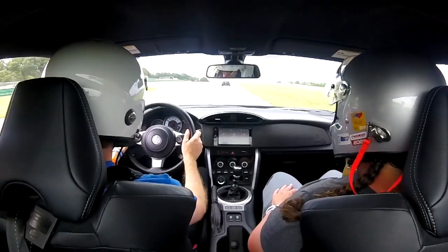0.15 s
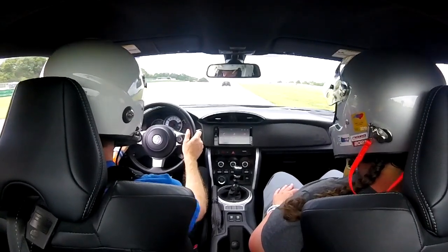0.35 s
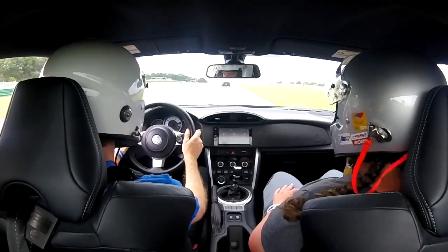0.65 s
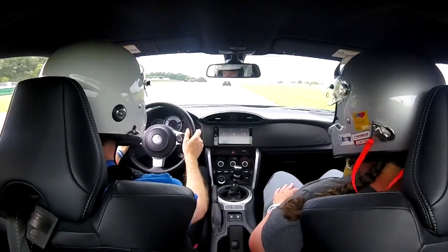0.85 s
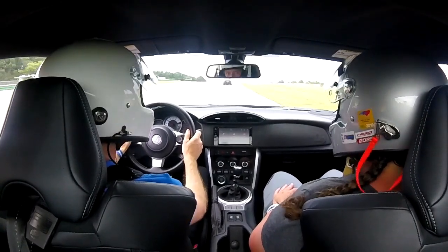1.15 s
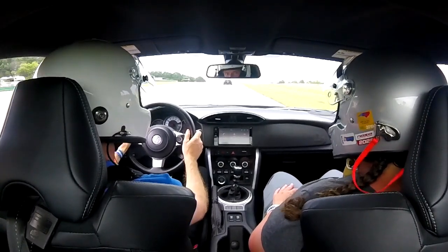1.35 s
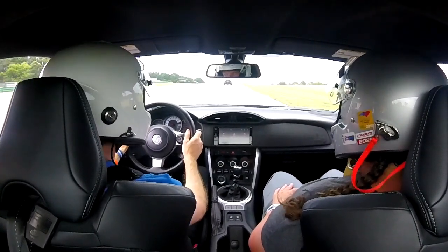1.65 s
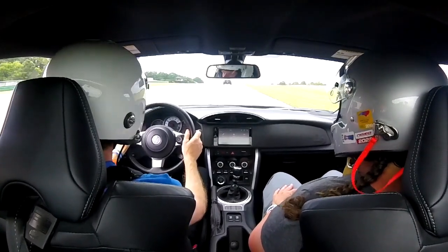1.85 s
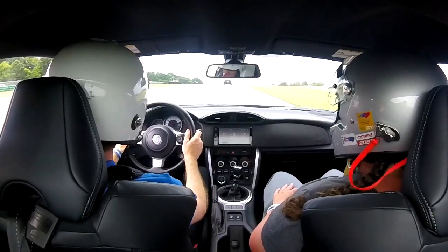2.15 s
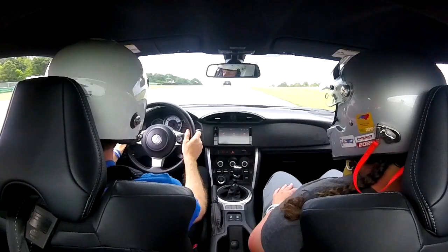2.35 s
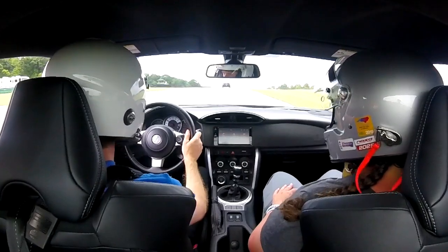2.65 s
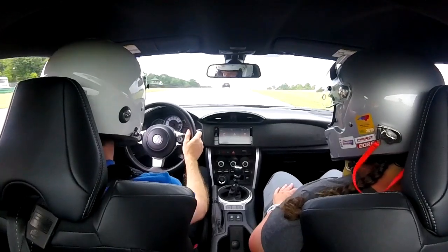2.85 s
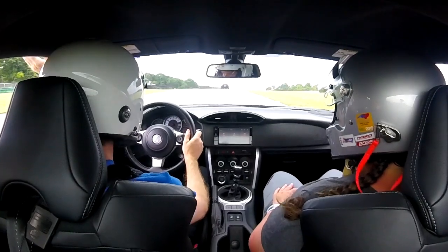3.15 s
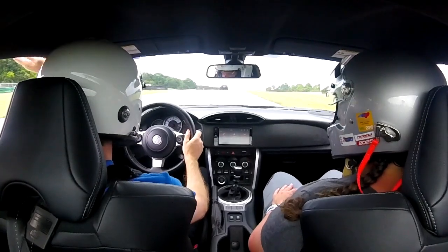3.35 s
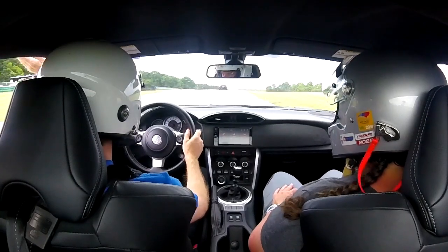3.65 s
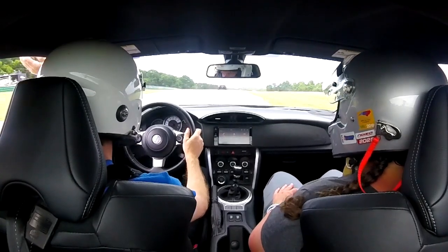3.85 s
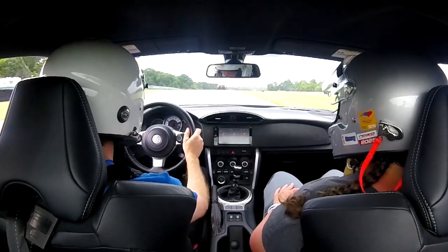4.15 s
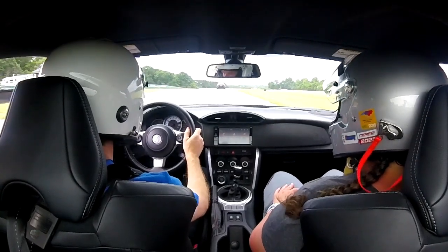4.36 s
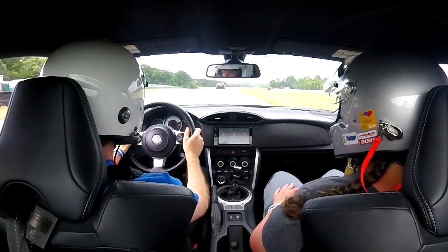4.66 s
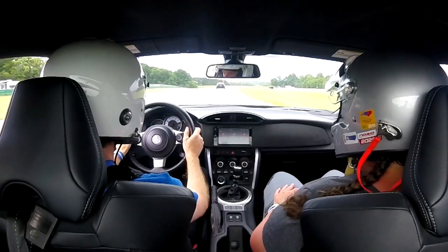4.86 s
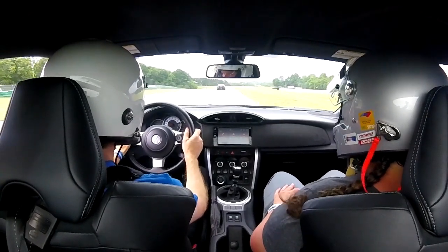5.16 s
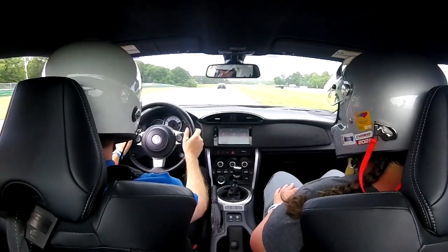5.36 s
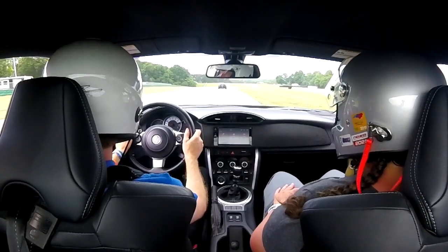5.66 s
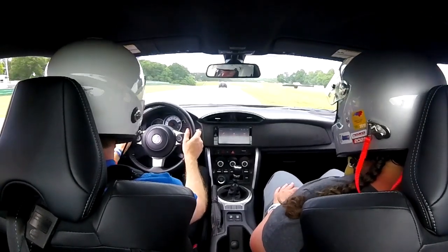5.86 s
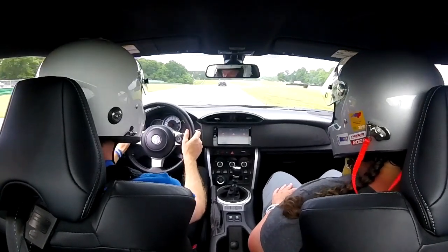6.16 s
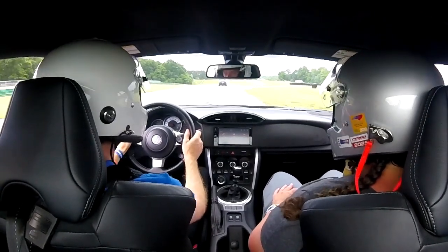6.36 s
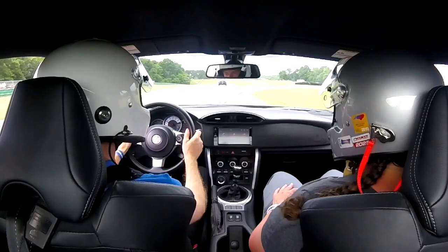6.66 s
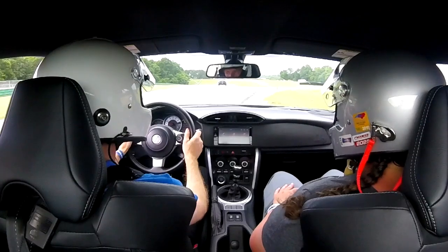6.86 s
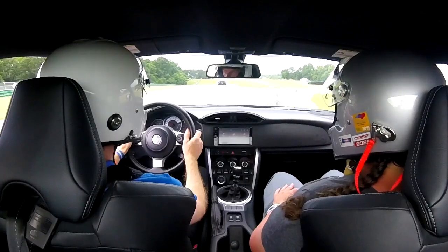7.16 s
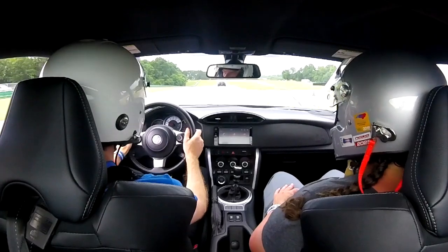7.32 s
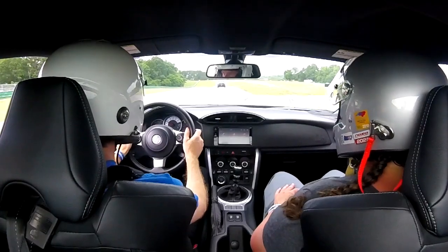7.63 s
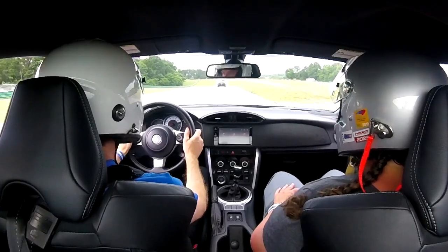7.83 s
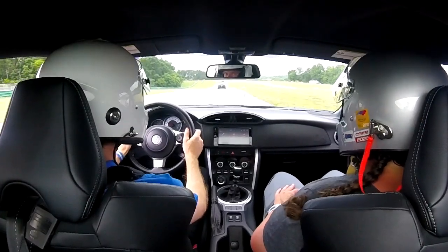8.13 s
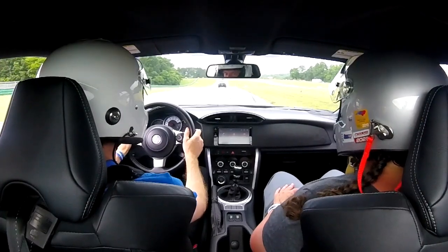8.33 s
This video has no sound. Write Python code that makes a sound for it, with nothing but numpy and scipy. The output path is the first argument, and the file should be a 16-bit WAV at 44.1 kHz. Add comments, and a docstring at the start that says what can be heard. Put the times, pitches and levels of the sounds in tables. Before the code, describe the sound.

Heard from the rear of a sports car cabin with windows down, a four-cylinder engine hums around 170 hertz on light throttle, sinking gradually to about 151 by 6.7 seconds. Underneath, cabin air throbs deeply near 28 hertz in uneven swells, strongest early, with tyre and wind roar and a fluttering, slightly whistling window hiss. Scattered soft gusts bump the microphone in the first three seconds; a faint, high brake squeal wavers at 1.6, with a weaker one at 1.8. From 3.4 to 6.8 wind slaps crowd together, thudding and crackling, hardest around 4.5, 5.2, 5.6 and 6.2, while the high hiss fades, almost vanishing by 6.9. Gusts then thin out. From 7.1 to 7.4 the throttle opens: the engine swells, gaining a rougher, fuller upper tone and creeping up slightly. Hiss partly returns; hard gusts strike around 8.25 before the end at 8.5.

```python
"""The engine of a four-cylinder sports car, heard from behind the seats with the windows down.
Its stacked tones sink slowly through a bend, then grow louder as the throttle opens and the pitch creeps up.
Shaped noise makes the throb of the cabin air, the roar of tyres and wind, and the hiss at the window frames.
Gusts slap the microphone with short pulses and bursts of noise, crowding together in the bend.
Two faint brake squeals are wavering tones."""
import sys
import numpy as np
from scipy import signal
from scipy.fft import rfft, irfft
from scipy.io import wavfile
from scipy.ndimage import uniform_filter1d

SR = 44100
rng = np.random.default_rng(int(sys.argv[2]) if len(sys.argv) > 2 else 0)


def master(y):
    """Save y as 16-bit WAV."""
    cut = np.clip(np.atleast_2d(y).T, -1, 1)
    pcm = np.round(cut * 32767)  # scale
    wavfile.write(sys.argv[1], SR, pcm.astype(np.int16))


N = 374409
T = np.arange(N) / SR  # time of each sample [s]
HZ = np.fft.rfftfreq(N, 1 / SR)  # frequency of each spectrum bin [Hz]


def gain_of(db):
    """Turns decibels into an amplitude factor."""
    return 10 ** (np.asarray(db) / 20)


def evened(x):
    """Scales a signal to rms 1."""
    return x / np.sqrt(np.mean(x ** 2) + 1e-20)


def level_curve(rows):
    """Joins the (time, level) rows of a table by straight lines."""
    seconds, level_db = np.transpose(rows)
    return np.interp(T, seconds, level_db)


def noise(colour, band, modes=()):
    """Noise with the given spectrum and resonances, scaled to rms 1 inside the band (low Hz, high Hz)."""
    colour_hz, colour_db = np.transpose(colour)
    shape_db = np.interp(np.log(HZ + 1), np.log(colour_hz), colour_db)
    for hz, width_hz, lift_db in modes:
        shape_db = shape_db + lift_db / (1 + (2 * (HZ - hz) / width_hz) ** 2)
    spectrum = rfft(rng.standard_normal(N)) * gain_of(shape_db)
    in_band = (HZ > band[0]) * (HZ < band[1])
    return irfft(spectrum, N) / np.std(irfft(spectrum * in_band, N))


def wander(hz):
    """Smooth random movement of rms 1, with little left above the given rate."""
    spectrum = rfft(rng.standard_normal(N))
    return evened(irfft(spectrum * np.exp(-(HZ / hz) ** 2), N))


def steadied(x, seconds):
    """Divides a noise by its local rms: slow swells go, the fast grain stays."""
    size = max(int(seconds * SR), 2)
    power = uniform_filter1d(uniform_filter1d(x ** 2, size), size)
    return x / np.sqrt(abs(power) + 1e-12)


def firing_rate():
    """Firings per second: a steady sag through the bend, then a slow climb."""
    start_hz, sag_hz_per_s, slowest_s, climb_hz_per_s = 169.7, 2.8, 6.7, .4
    sag = sag_hz_per_s * np.minimum(T, slowest_s)
    climb = climb_hz_per_s * np.maximum(T - slowest_s, 0)
    return start_hz - sag + climb


def pedal():
    """Throttle from 0 to 1: light through the bend, then pressed to the floor at its exit."""
    light_throttle, open_at_s = .12, 7.1
    full_travel_s = 0.28  # time for a whole 0-1 movement
    return np.clip(light_throttle + np.maximum(T - open_at_s, 0) / full_travel_s, 0, 1)


def engine():
    """Each firing repeats four times per engine cycle; tones at multiples of that cycle make the note."""
    # Strength of each tone at the two ends of the pedal; full throttle lifts orders 8 and 16 most, then 5 and 3:
    # (multiple of the four-stroke cycle, level on light throttle [dB], level on full throttle [dB])
    engine_orders = [(2, -8, -11), (3, -14, -9), (4, 0, 0), (5, -18, -12), (6, -16, -15), (7, -24, -26),
                     (8, -22, -6), (10, -21, -28), (12, -25, -22), (15, -27, -28), (16, -32, -22),
                     (20, -33, -30), (28, -38, -34)]
    base_db, full_throttle_db = -35, 7.5
    boom_hz, boom_width_hz, boom_db = 165.4, 5.3, 6
    firing, throttle = firing_rate(), pedal()
    # the cabin booms as the firing rate passes its resonance
    boom = 1 / (1 + (2 * (firing - boom_hz) / boom_width_hz) ** 4)
    engine_db = base_db + boom_db * boom + full_throttle_db * throttle
    # four firings make one cycle; its speed is slightly unsteady
    cycles = np.cumsum(firing / 4 * (1 + .0015 * wander(10))) / SR
    tones = np.zeros(N)
    for order, light_db, full_db in engine_orders:
        flutter_db = (1.2 + throttle) * wander(10)
        order_db = light_db + throttle * (full_db - light_db) + flutter_db
        tones += gain_of(order_db) * np.sin(2 * np.pi * (round(order) * cycles + rng.random()))
    return np.sqrt(2) * gain_of(engine_db) * tones


def gust_force(gust_db=0, draught_db=-1, lumpy_db=4.5, knee_db=-24, rise=1.57, fall=0.76):
    """Wind strength on the microphone, 1 at the knee level; gusts rise faster than they fall."""
    # Eddies between gusts, before the draught_db trim: (time [s], level [dB])
    draught_points = [(0, -40), (.7, -51.5), (3.0, -48.5), (3.95, -34.5), (4.35, -45), (4.9, -41.5),
                      (5.6, -31), (5.9, -36), (6.35, -32), (6.75, -39.5), (7.05, -44.5), (7.5, -50),
                      (7.75, -35.5), (8.3, -38), (8.49, -41)]
    # Stronger gusts; rise and fall reshape the length: (peak time [s], peak level [dB], nominal length [s])
    gust_peaks = [(0.094, -27, 0.037), (0.173, -27, 0.011), (0.403, -29.5, .006), (0.445, -25, .018),
                  (.817, -32.5, 0.026), (1.004, -27.5, 0.018), (1.063, -27.5, 0.011), (1.283, -33, 0.0091),
                  (1.426, -26.5, .016), (1.564, -29.5, 0.015), (2.065, -28.5, 0.017), (2.567, -30, 0.026),
                  (2.795, -33.5, 0.03), (3.407, -22.5, 0.018), (3.566, -28, 0.013), (3.603, -26.5, 0.0047),
                  (3.705, -24, 0.016), (3.762, -26, 0.023), (3.86, -25.5, .024), (3.888, -17.5, 0.013),
                  (3.923, -24, 0.025), (3.948, -21, 0.011), (4.014, -27, .031), (4.08, -25, .017),
                  (4.155, -22, 0.025), (4.215, -25, 0.019), (4.234, -21.5, .006), (4.474, -15.5, 0.0074),
                  (4.492, -15.5, 0.026), (4.636, -28.5, 0.016), (4.691, -29.5, 0.076), (4.914, -22, 0.027),
                  (5.102, -24, 0.025), (5.192, -22, 0.0026), (5.23, -16.5, .013), (5.258, -20.5, 0.02),
                  (5.382, -35, 0.021), (5.469, -22, 0.0092), (5.497, -22, 0.032), (5.604, -15.5, 0.0078),
                  (5.624, -22, 0.032), (5.661, -20.5, 0.013), (5.806, -20, 0.015), (5.836, -22.5, 0.021),
                  (5.99, -26.5, 0.054), (6.093, -19, 0.013), (6.114, -24, 0.029), (6.209, -14, 0.011),
                  (6.231, -20.5, 0.0087), (6.298, -22, 0.0093), (6.326, -24, 0.0048), (6.352, -21.5, .008),
                  (6.36, -27.5, .014), (6.426, -25, 0.015), (6.487, -23, 0.039), (6.529, -28, .023),
                  (6.644, -25, 0.016), (6.699, -22.5, 0.0065), (6.768, -21, 0.0097), (6.815, -34.5, .008),
                  (6.862, -37, 0.029), (6.941, -36.5, 0.011), (6.981, -28, 0.0087), (7.292, -29, 0.026),
                  (7.682, -22.5, 0.012), (8.035, -32, 0.011), (8.054, -27, 0.012), (8.069, -21.5, 0.01),
                  (8.242, -17, 0.013), (8.269, -13.5, 0.0071), (8.287, -20.5, 0.022), (8.354, -18.5, 0.021),
                  (8.391, -26.5, 0.02)]
    power = gain_of(level_curve(draught_points) + draught_db + lumpy_db * wander(53)) ** 2
    for s, db, length in gust_peaks:
        near = slice(max(int((s - 2 * length) * SR), 0), int((s + 2 * length) * SR))
        offset = 2 * (T[near] - s) / length
        steepness = np.where(offset < 0, rise, fall)
        power[near] += gain_of(db + gust_db) ** 2 * np.exp(-(offset * steepness) ** 2)
    return np.sqrt(power) / gain_of(knee_db)


def cabin(force, swell_db=3.5, follow=0.87):
    """Cabin air throbs like a blown bottle; broader low buffeting swells with the gusts."""
    # Throb of the cabin air, before its random swells: (time [s], level [dB])
    throb_points = [(0, -10.5), (.7, -20), (1.03, -10), (1.7, -17.5), (2.65, -12.5), (3.3, -18),
                    (4.15, -17), (5.1, -14.5), (5.45, -19.5), (7.4, -22), (7.85, -17), (8.49, -24)]
    # Low buffeting between gusts: (time [s], level [dB])
    buffet_points = [(0, -22), (1.2, -26.5), (3.1, -24), (3.5, -16.5), (4.0, -20), (4.35, -25), (5.6, -20),
                     (6.2, -28), (7.15, -29.5), (8.3, -19)]
    # Spectra of throb and buffeting: (frequency [Hz], relative level per Hz [dB])
    throb_colour = [(10, -3.5), (20, 9), (28, 13.5), (34, 7.5), (45, 1), (70, -9.5), (140, -73.5)]
    buffet_colour = [(25, -28), (50, 3), (82, 4.5), (115, -1.5), (200, -8), (300, -19.5), (450, -54),
                     (1000, -65.5)]
    # what a gust of force 1 adds, and the time over which the force is averaged
    buffet_gust_db, smoothing_s = -21, 0.033
    throb = steadied(noise(throb_colour, (18, 48)), .12)
    buffet = steadied(noise(buffet_colour, (50, 135)), .1)
    push = abs(uniform_filter1d(force, int(smoothing_s * SR))) ** follow
    buffet_gain = np.hypot(gain_of(level_curve(buffet_points)), gain_of(buffet_gust_db) * push)
    throb_gain = gain_of(level_curve(throb_points) + swell_db * wander(5.7))
    return throb * throb_gain + buffet * buffet_gain


def airflow(hiss_db=-4.0, flutter_db=1.76):
    """Tyres and passing air roar; the window frames add a fluttering hiss and a thin jet through a gap."""
    # Hiss at the window frames, before the hiss_db trim: (time [s], level [dB])
    hiss_points = [(0, -53.5), (1.7, -57), (2.05, -53.5), (2.45, -55), (4.3, -57.5), (6.4, -62.5),
                   (6.9, -73), (7.3, -62.5), (8.49, -59)]
    # Resonances of the window gaps: (frequency [Hz], width [Hz], lift [dB])
    gap_modes = [(2420, 88, 5.5), (2650, 130, 12.5), (2893, 82, 7.5), (2970, 40, 3.5), (3190, 110, 3.5),
                 (3680, 61, 3), (4640, 120, 1.5)]
    # Spectra of roar, hiss and jet: (frequency [Hz], relative level per Hz [dB])
    roar_colour = [(100, -20), (250, 6.5), (450, 3.5), (700, -2.5), (1000, -6.5), (1500, -11), (2000, -14),
                   (2700, -25.5), (3600, -25), (5000, -45.5), (6500, -52), (7800, -32), (9500, -73),
                   (15000, -42)]
    hiss_colour = [(800, -3), (2200, 9.5), (2700, 2.5), (3200, 6), (3600, 2.5), (5200, 2.5), (6000, -3.5),
                   (7000, -9.5), (15000, -21)]
    jet_colour = [(3000, -26), (5000, -15), (6100, 5.5), (6420, 10.5), (6650, 4.5), (6950, -12),
                  (9500, -18), (15000, -8)]
    # roar_db holds where the hiss curve is at cruise_hiss_db; roar_follow is dB of roar per dB of hiss
    roar_db, cruise_hiss_db, roar_follow, roar_throttle_db = -44.5, -56.5, 0.54, -1.5
    # the jet's level against the hiss, and its dying away in the bend
    jet_db, jet_fades_s, jet_fade_db_per_s = -4.3, 4.2, 8
    hiss_level = level_curve(hiss_points)
    roar_level = roar_db + roar_follow * (hiss_level - cruise_hiss_db) + roar_throttle_db * pedal()
    jet_level = hiss_level + jet_db - jet_fade_db_per_s * np.maximum(T - jet_fades_s, 0)
    roar = noise(roar_colour, (500, 2000))
    hiss = noise(hiss_colour, (3500, 5500), gap_modes)
    jet = noise(jet_colour, (5500, 7000))
    window = hiss * gain_of(hiss_level) + jet * gain_of(jet_level)
    return roar * gain_of(roar_level) + window * gain_of(hiss_db + flutter_db * wander(31))


def gusts(force, level_db=-24, slap_db=1, small_db=0, brighten=0.49, slap_s=0.00079):
    """Eddies hit the microphone: each is a slap of pressure with a few milliseconds of crackle."""
    # Spectrum of the turbulence: (frequency [Hz], relative level per Hz [dB])
    gust_colour = [(40, -1), (110, 9), (220, 4), (400, 1.5), (700, -8), (1000, -11.5), (1600, -19.5),
                   (2100, -23.5), (3100, -29.5), (4200, -36.5), (6500, -45.5), (9500, -47.5), (15000, -43)]
    t = T[:1500]
    # eddies arrive at uneven intervals and with uneven sizes
    eddies_per_s = 110 * gain_of(4.5 * wander(150))
    count = np.floor(np.cumsum(eddies_per_s) / SR)
    sizes = gain_of(3.6 * np.clip(rng.standard_normal(N), -2, 1.5))
    hits = np.diff(count, prepend=0) * sizes
    crackle_shape = np.exp(-t / .002) - np.exp(-t / .0002)
    bursts = .21 + signal.oaconvolve(hits, crackle_shape)[:N]
    # a slap may push or pull
    slap_shape = t / slap_s * np.exp(-t / slap_s)
    slaps = signal.oaconvolve(hits * rng.choice([-1, 1], N), slap_shape)[:N]
    slaps = gain_of(slap_db) * steadied(slaps, .03)
    # turbulence in three sizes: the smaller the swirl, the more it bunches into bursts
    swirls = rfft(noise(gust_colour, (350, 5000)))
    low = 1 / (1 + (HZ / 300) ** 4)
    high = 1 - 1 / (1 + (HZ / 1500) ** 4)
    large, middle, small = (irfft(swirls * share, N) for share in (low, 1 - low - high, high))
    large = np.std(large) * steadied(large, .015)
    middle = np.std(middle) * steadied(middle * bursts ** .8, .016)
    small = np.std(small) * steadied(small * bursts, .025)
    # weak gusts thud, strong ones tear
    thud = large * force ** .9
    tearing = gain_of(small_db) * np.minimum(force, 1.8) ** brighten
    return gain_of(level_db) * (thud + (middle + slaps + small * tearing) * force)


def squeal(waver=0.0018):
    """A brake pad sings a slightly wavering tone for a moment, swelling and fading."""
    # Faint brake squeals: (start [s], length [s], pitch [Hz], rms level at the fullest point [dB])
    squeal_notes = [(1.612, 0.13, 3140, -54), (1.78, .14, 3130, -64)]
    out = np.zeros(N)
    for s, length, hz, db in squeal_notes:
        arch = np.sin(np.pi * np.clip((T - s) / length, 0, 1)) ** 2
        turns = np.cumsum(hz * (1 + waver * wander(30))) / SR
        out += arch * gain_of(db) * np.sin(2 * np.pi * turns)
    return np.sqrt(2) * out


def scene():
    """Adds all sounds at one microphone; the same wind drives the buffeting and the slaps."""
    force = gust_force()
    return (engine() + cabin(force) + airflow() + gusts(force) + squeal())[None]


def record(dry):
    """Adds a faint high sizzle that follows the sound, rounds off peaks and removes the top treble."""
    upper = signal.lfilter(*signal.butter(1, 700, "high", fs=SR), dry)
    # multiplying by a 12100 Hz tone moves the sound up around that pitch
    sizzle = gain_of(-28) * upper * np.cos(2 * np.pi * 12100 * T)
    x = dry + sizzle
    rounded = x / (1 + x ** 8) ** (1 / 8)
    low_pass = signal.firwin(1023, 15850, window=("kaiser", 9), fs=SR)  # edge in Hz
    return signal.oaconvolve(rounded, low_pass[None], "same")


dry = scene()
out = record(dry)
master(out)
```